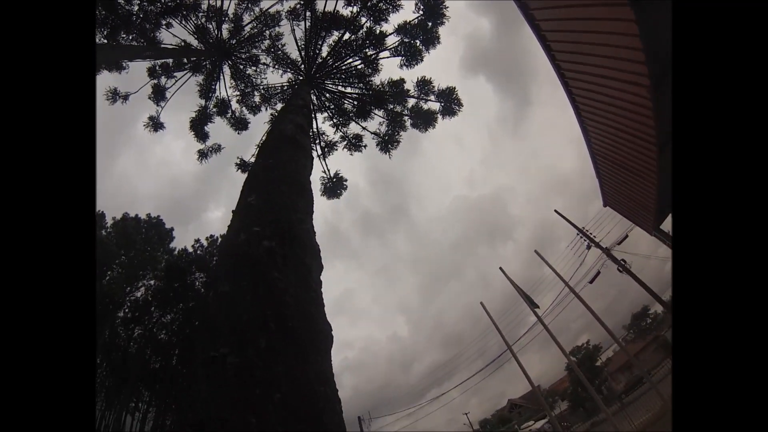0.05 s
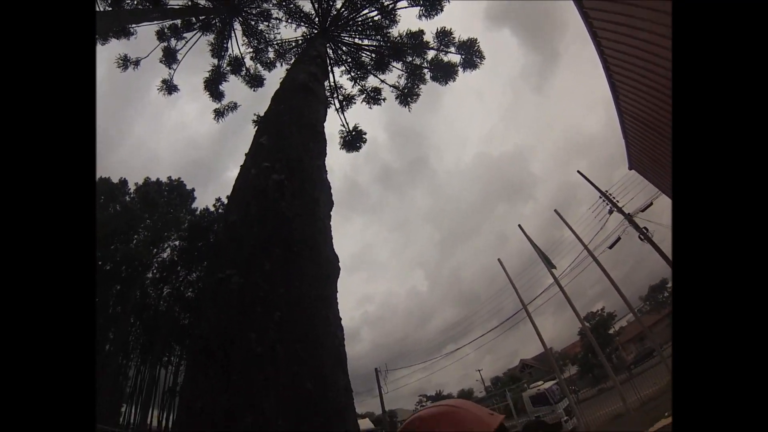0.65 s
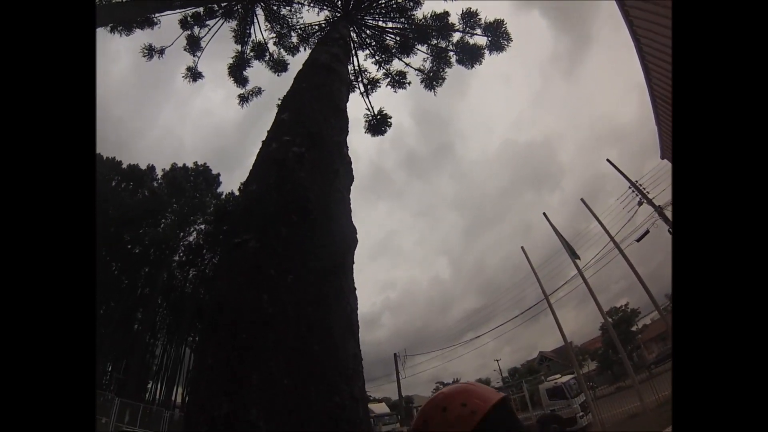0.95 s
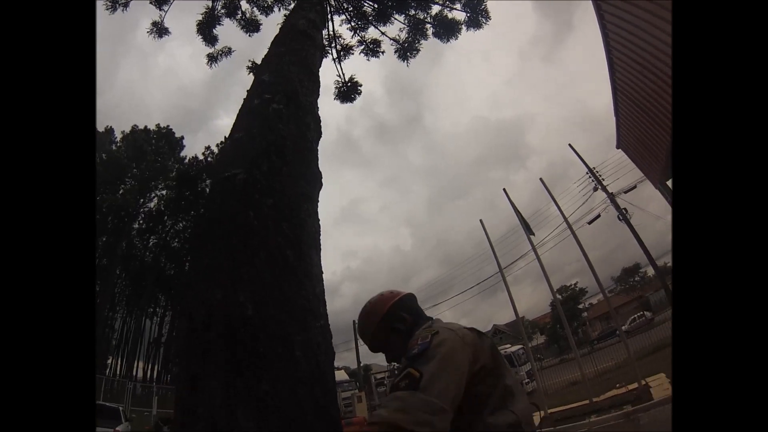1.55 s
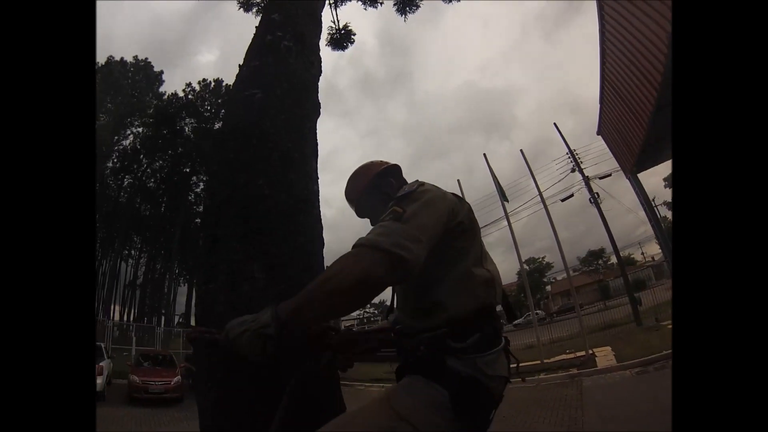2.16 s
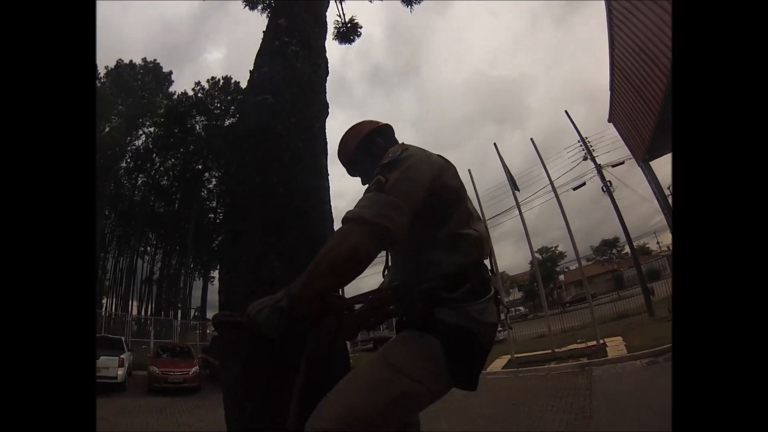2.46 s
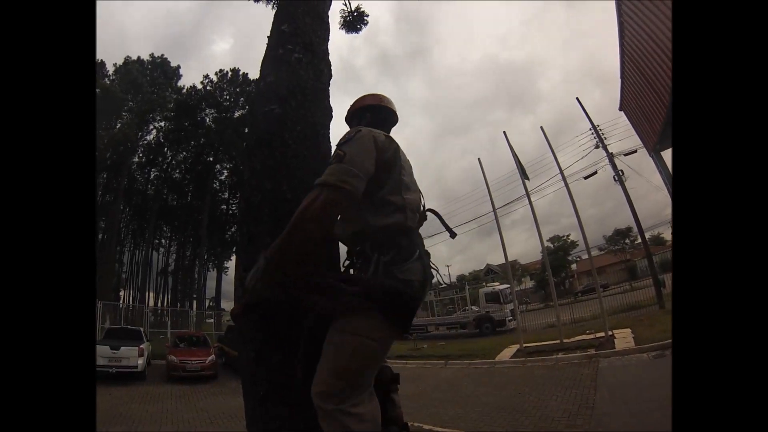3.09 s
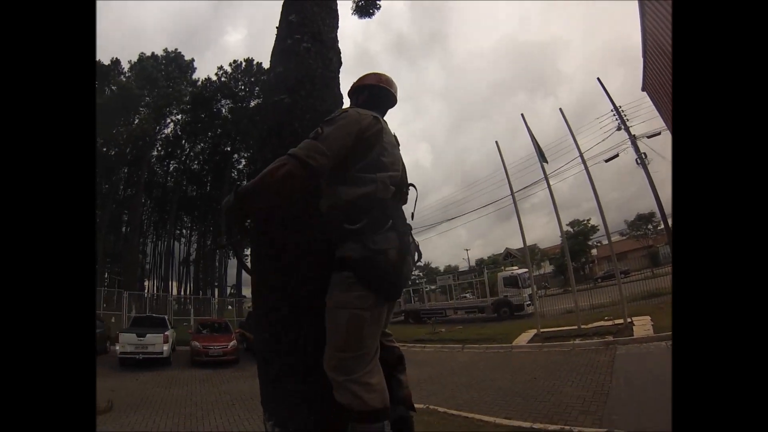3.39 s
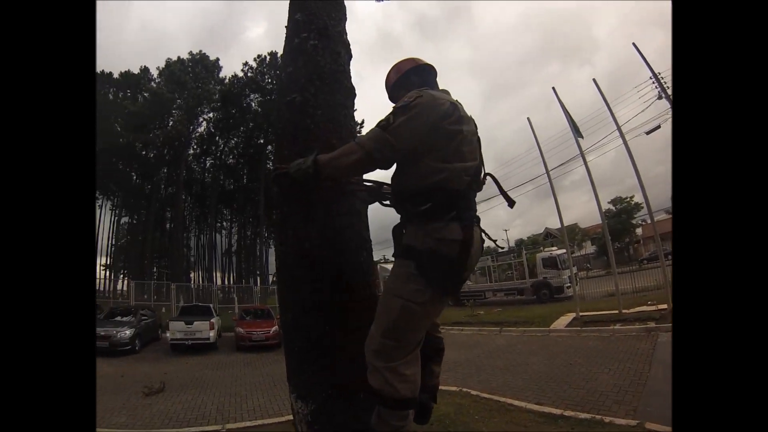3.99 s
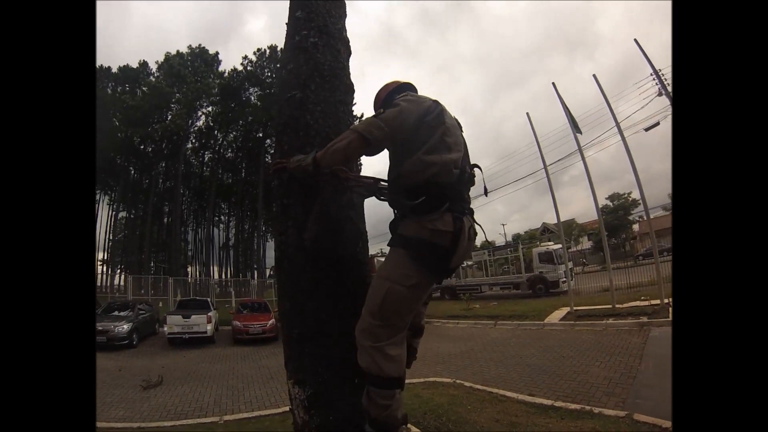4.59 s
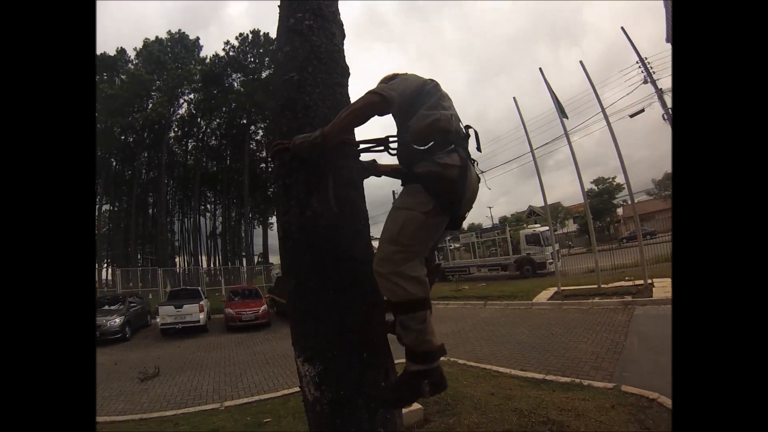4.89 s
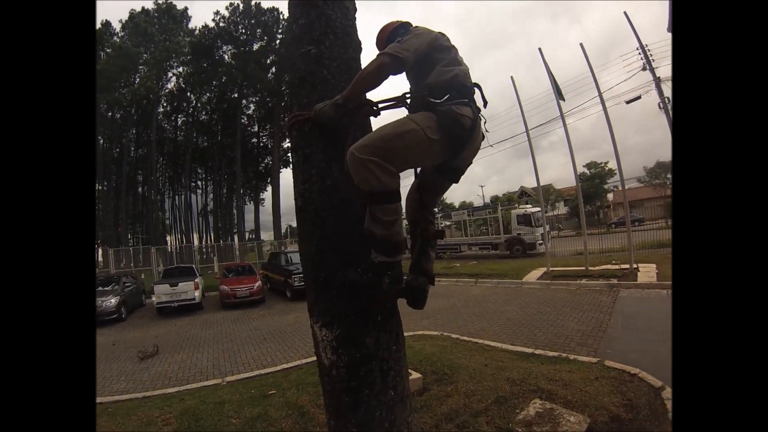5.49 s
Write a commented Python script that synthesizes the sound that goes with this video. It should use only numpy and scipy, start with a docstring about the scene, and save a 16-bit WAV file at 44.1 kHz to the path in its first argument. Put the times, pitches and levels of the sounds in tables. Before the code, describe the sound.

In a quiet yard, low puffs of wind rumble on the microphone, with soft bumps from the hand holding it. A climber's hook clinks faintly, a strap scuffs bark and spurs tap a tree trunk. Past the middle, buckles tick thinly and one sharp, hollow knock of gear stands out. More small clinks follow, then a firmer spur tap near the end, all over a faint outdoor hush.

```python
"""One sharp, hollow knock of gear stands out as a climber works up a tree in a quiet yard.
Spurs tap and crunch into the bark, buckles and a snap hook ring thinly, a strap scuffs the trunk.
Close up, puffs of air rumble on the microphone and the hand holding the camera bumps softly.
Behind it all sit a faint outdoor hush, far whistles, hiss and a tiny fizz once a second."""
import sys
import numpy as np
from scipy import signal
from scipy.fft import rfft, irfft, next_fast_len
from scipy.io import wavfile
from scipy.ndimage import uniform_filter1d, map_coordinates

SR = 44100
rng = np.random.default_rng(int(sys.argv[2]) if len(sys.argv) > 2 else 0)


def master_out(mix):
    """Clip the mix to full scale and print it as 16-bit PCM to the path in sys.argv[1]."""
    frames = np.transpose(np.atleast_2d(mix))
    ceiling = np.clip(frames, -1, 1)
    pcm = np.round(ceiling * 32767).astype(np.int16)
    wavfile.write(sys.argv[1], SR, pcm)


N = 249165

# Hollow gear knocks and rebounds. Each row: start in seconds, level in dB.
KNOCK_HITS = [(3.6264, -21.3), (3.6345, -41)]
# Its modes. Each row: pitch in Hz, level in dB, 60 dB decay time in seconds, swell in seconds.
HOLLOW_MODES = [(1117, 5.5, 0.011, 0.0016), (1314, 6.5, 0.014, 0.00091), (1320, -54, 0.37, .002),
                (1500, -16, 0.013, 0.0017), (1814, -15.5, 0.016, 0.00015), (2140, -15, 0.021, 0.0014),
                (2260, -20, 0.025, 0.0016), (2830, -33, 0.067, 0.00023), (3200, -20, 0.022, 0.0002),
                (3450, -17, 0.024, 0.00068), (3740, -19, 0.023, 0.00033), (4160, -24, 0.0086, .0001),
                (4970, -32.5, 0.033, 0.00011), (6000, -35, 0.012, .0001)]
# Spurs meet bark. Each row: start in seconds, level in dB, crunch share 0-1, crunch tilt in dB/octave.
SPUR_TAPS = [(1.9475, -42.5, .75, -4), (1.9525, -44, .65, -2), (2.706, -51.5, .9, 2.5),
             (3.918, -47.5, .9, -5), (4.0563, -52, .9, 4), (5.3018, -34.7, .14, -.5),
             (5.3075, -46.5, .35, -4)]
# A spur in the trunk. Each row: pitch in Hz, level in dB, 60 dB decay time in seconds.
SPUR_MODES = [(710, 2, .03), (960, -13, .02), (1220, -7, .024), (1410, -8, .04), (2180, -10.5, .022),
              (2440, -7.5, .034), (3250, -14, .022), (3640, -7.5, .018), (4300, -16, .016),
              (6770, -15, .018)]
# Buckles touch. Each row: start in seconds, level in dB, ring share 0-1, pitch multiple,
# click tilt in dB/octave.
BUCKLE_TICKS = [(2.89, -58, .1, 1, 0), (3.2285, -51, .6, 1, 0), (3.2315, -45.5, .78, 1, 1),
                (3.234, -47, .8, 1, 1), (3.3448, -47.8, .38, 1.08, -3.5), (3.3748, -50, .3, .85, -4)]
# A buckle's ring. Each row: pitch in Hz, level in dB, 60 dB decay time in seconds.
BUCKLE_MODES = [(4370, -10, .03), (5930, -4.5, .038), (8900, -10, .022), (9380, -1, .026), (9700, -4, .024),
                (11340, -5, .032), (12330, -9, .025)]
# The snap hook shifts. Each row: start in seconds, level in dB, dry rub share 0-1, pitch in Hz.
HOOK_CLINKS = [(.866, -52, .15, 2200), (.879, -53, .15, 2280), (.888, -52, .15, 2200),
               (2.679, -58, .3, 2350), (2.707, -51, .35, 2250), (4.057, -52.5, .3, 2100),
               (4.615, -52, .2, 2320), (4.634, -51.5, .2, 2220), (4.8984, -50.5, .25, 2270),
               (5.0995, -50, .16, 2130)]
# The hook's ring. Each row: multiple of its pitch, level in dB, 60 dB decay time in seconds.
HOOK_MODES = [(1, 0, .045), (1.07, -7, .03), (1.7, -8, .035), (2.35, -12, .02)]
# Strap drags. Each row: middle and half-width in seconds, level in dB, tone centre in Hz.
STRAP_SCUFFS = [(.832, .008, -65, 2900), (.836, .01, -62, 1080), (.861, .016, -62, 1300),
                (.874, .015, -61.5, 2150), (.876, .014, -66.5, 3700), (.935, .025, -69, 2500),
                (1.98, .04, -72, 3000), (2.14, .015, -70, 2800), (2.696, .019, -68.5, 3800),
                (3.36, .025, -71, 3400), (4.665, .02, -67, 4500), (4.888, .022, -69, 5300),
                (5.1, .006, -66.5, 2900)]
# Soft bumps of the hand. Each row: middle in seconds, peak in dB, pitch in Hz, hardness 0-1.
HAND_BUMPS = [(0.679, -35.3, 82, .14), (1.627, -39, 112, .1), (1.71, -44.5, 180, 0),
              (1.948, -38.5, 92, .16), (1.956, -48, 190, .3), (3.213, -44, 70.4, 0), (3.499, -42, 74, .05),
              (4.279, -42.5, 84.5, 0), (4.604, -35, 91, .03), (4.628, -34.5, 88, .04),
              (4.818, -39.5, 106, 0), (4.968, -38.5, 86, .2), (5.42, -35.5, 61.7, 0)]
# Puffs of air. Each row: middle and half-width in seconds, rise over the calm in dB.
AIR_PUFFS = [(0.078, 0.016, 10), (0.493, 0.12, 6), (0.957, 0.062, 9.5), (1.72, 0.12, 13), (1.99, 0.047, 9),
             (2.222, 0.027, 9.5), (3.319, 0.019, 9), (3.655, 0.12, 10), (3.977, 0.06, 8),
             (4.477, 0.16, 4.5), (4.875, 0.016, 9.5), (5.43, 0.014, 12)]
# Far whistles. Each row: middle and half-width in seconds, level in dB, pitch in Hz,
# glide in Hz per second, waver in Hz.
FAR_WHISTLES = [(0.3, 0.079, -74, 2180, 196, 120), (.36, .05, -77, 3760, -600, 80.4),
                (1.3, 0.06, -73.5, 2950, -1000, 280), (1.5, 0.06, -73, 2340, 900, 70),
                (1.66, 0.075, -73, 2460, -500, 65), (2.222, 0.1, -75, 2260, -700, 110)]
# Noise colours. Each row: frequency in Hz, relative level in dB.
BARK_SPECTRUM = [(300, -56), (800, -1.5), (1200, 7.5), (1700, -2.5), (2200, 2), (3000, -6.5), (3800, -5),
                 (6000, -9), (12000, -20)]
DAMPED_METAL_SPECTRUM = [(1000, -19), (3000, -7), (5500, 4), (8000, 1.5), (11000, -2), (15000, -27)]
BUFFET_SPECTRUM = [(5, -21.5), (12, -3), (20, 2), (30, -4.5), (38, -4), (48, -18), (60, -22.5), (80, -37.5),
                   (150, -62), (400, -100)]
GRIP_SPECTRUM = [(25, -21.5), (55, 1.5), (75, 0), (110, -5.5), (160, -12.5), (250, -19.5), (450, -28),
                 (1000, -50)]
HUSH_SPECTRUM = [(60, -4), (200, 5), (400, 2.5), (700, 0.5), (1000, -2.5), (1350, -1), (1800, -5.5),
                 (2350, -4.5), (3000, -9.5), (5000, -14.5), (10000, -26)]
HISS_SPECTRUM = [(100, 0), (1000, 3.5), (4000, 2.5), (7000, 0.5), (10000, -1.5), (13000, -3), (15000, -9)]
FIZZ_SPECTRUM = [(3000, -22), (9000, -10), (12500, -3), (14500, 0), (16000, -6)]

CALM_DB = -40  # rumble between the puffs
GRIP_DB, GRIP_RISE_DB_PER_S = -59, 0.47
HUSH_DB, HUSH_FADE_DB_PER_S = -63, 0.29
GRIP_FOLLOWS, HUSH_FOLLOWS = 0.42, 0.071  # dB gained per dB of a puff
EDGE_MULTIPLE = 3.1  # how much higher the hard edge of a bump sounds
FIZZ_DB, FIZZ_FIRST_S, FIZZ_PERIOD_S, FIZZ_GAP_S, FIZZ_HALF_S = -72, .485, 1.002, .025, .005
TOP_HZ = 15250


def knock():
    """Hollow gear: the low cavity modes swell, the top ones speak at once, one faint ring lingers."""
    out, t = np.zeros(N), np.arange(SR // 5) / SR
    body = sum(amp(db) * fade(t, t60) * swell(t, swell_s) * np.sin(2 * np.pi * hz * t)
               for hz, db, t60, swell_s in HOLLOW_MODES)
    body /= np.abs(body).max()
    for start, db in KNOCK_HITS:
        crack = amp(-38) * fade(t, .016) * noise(BARK_SPECTRUM, size=len(t))
        add(out, start, amp(db) * (body + crack))
    low_cut = signal.butter(6, 840, "high", fs=SR, output="sos")  # a small body radiates little bass
    return signal.sosfilt(low_cut, out)


def spurs():
    """Each tap sinks in over a millisecond, crunches bark and rings the spur, damped by the wood."""
    out, t = np.zeros(N), np.arange(SR // 10) / SR
    attack = swell(t, .0009)
    for start, db, crunch_share, tilt_db in SPUR_TAPS:
        crunch = amp(-2) * fade(t, .028) * noise(BARK_SPECTRUM, tilt_db, size=len(t))
        tap = (1 - crunch_share) * ring(SPUR_MODES, t) + crunch_share * crunch
        add(out, start, amp(db) * attack * tap)
    return out


def buckles():
    """Free metal rings thinly; metal held by webbing only clicks."""
    out, t = np.zeros(N), np.arange(SR // 10) / SR
    attack = 1 - np.exp(-t / .0012)
    for start, db, ring_share, multiple, tilt_db in BUCKLE_TICKS:
        modes = [(multiple * hz, level, t60) for hz, level, t60 in BUCKLE_MODES]
        click = fade(t, .022) * noise(DAMPED_METAL_SPECTRUM, tilt_db, size=len(t))
        tick = ring_share * ring(modes, t) + (1 - ring_share) * click
        add(out, start, amp(db) * attack * tick)
    return out


def snap_hook():
    """The heavier hook clinks lower in its ring; pitch and dryness change with how it lies."""
    out, t = np.zeros(N), np.arange(SR // 10) / SR
    attack = 1 - np.exp(-t / .0012)
    for start, db, rub_share, hz in HOOK_CLINKS:
        modes = [(multiple * hz, level, t60) for multiple, level, t60 in HOOK_MODES]
        rub = fade(t, .035) * noise(DAMPED_METAL_SPECTRUM, tilt_db=-4, size=len(t))
        clink = (1 - rub_share) * ring(modes, t) + rub_share * rub
        add(out, start, amp(db) * attack * clink)
    return out


def strap():
    """Short drags of the strap catch unevenly on the rough bark, some duller, some brighter."""
    out, t = np.zeros(N), np.arange(N) / SR
    for middle, half, db, centre_hz in STRAP_SCUFFS:
        colour = [(hz, level - 7 * abs(np.log2(hz / centre_hz))) for hz, level in BARK_SPECTRUM]
        catches = unit(amp(3.3 * wobble(260)))
        out += amp(db) * bell(t - middle, half) * catches * noise(colour)
    return out


def hand():
    """The grip murmurs through the camera body, more in a puff; harder bumps get a sharper edge."""
    t = np.arange(N) / SR
    grip_db = GRIP_DB + GRIP_RISE_DB_PER_S * t + GRIP_FOLLOWS * breeze_db() + 2.23 * wobble(14)
    out = amp(grip_db) * noise(GRIP_SPECTRUM)
    for middle, db, hz, hardness in HAND_BUMPS:
        thud = push(t - middle, hz)
        edge = push(t - middle, EDGE_MULTIPLE * hz)
        out += amp(db) * ((1 - hardness) * thud + hardness * edge)
    return out


def air_rumble():
    """Slow eddies press on the microphone, evened out so that the breeze rides their level."""
    eddies = noise(BUFFET_SPECTRUM)
    running_rms = np.sqrt(np.abs(uniform_filter1d(eddies ** 2, size=SR // 8)))
    return amp(CALM_DB + breeze_db()) * eddies / running_rms


def breeze_db():
    """How far the moving air rises above the calm as each puff swells and sinks."""
    t = np.arange(N) / SR
    return sum(db * bell(t - middle, half) for middle, half, db in AIR_PUFFS)


def hush_and_hiss():
    """The yard's far hush recedes, drifts and stirs with the breeze, over steady microphone hiss."""
    drift_db = .35 * wobble(7)
    hush_db = HUSH_DB - HUSH_FADE_DB_PER_S * np.arange(N) / SR + HUSH_FOLLOWS * breeze_db()
    return amp(hush_db + drift_db) * noise(HUSH_SPECTRUM) + amp(-69) * noise(HISS_SPECTRUM)


def whistles():
    """Thin wavering whistles, perhaps far birds, barely heard through the hush."""
    out, t = np.zeros(N), np.arange(N) / SR
    for middle, half, db, hz, glide, waver in FAR_WHISTLES:
        pitch = hz + glide * (t - middle) + waver * wobble(400)
        tone = unit(np.sin(2 * np.pi * np.cumsum(pitch) / SR))
        out += amp(db) * bell(t - middle, half) * tone
    return out


def fizz():
    """Two tiny flicks of high fizz once a second, probably from the camera's electronics."""
    t = np.arange(N) / SR
    starts = np.arange(FIZZ_FIRST_S, N / SR, FIZZ_PERIOD_S)
    flicks = sum(bell(t - start - lag, FIZZ_HALF_S) for start in starts for lag in (0, FIZZ_GAP_S))
    return amp(FIZZ_DB) * flicks * noise(FIZZ_SPECTRUM)


def yard_echo(sound):
    """Ground and walls scatter a short, diffuse tail."""
    t = np.arange(SR // 2) / SR
    tail = fade(t, t60=0.31) * rng.standard_normal(len(t))
    return signal.fftconvolve(sound, tail / np.linalg.norm(tail))[:N]


def ring(modes, t):
    """Damped modes, struck at slightly new strengths each time, peak 1."""
    partials = sum(amp(db + rng.normal()) * fade(t, t60) * np.sin(2 * np.pi * (hz * t + rng.random()))
                   for hz, db, t60 in modes)
    return partials / np.abs(partials).max()


def push(t, hz):
    """One push at t = 0 with a dip on either side, strongest at hz."""
    spread = (np.pi * hz * t) ** 2
    return (1 - 2 * spread) * np.exp(-spread)


def noise(spectrum, tilt_db=0, size=N):
    """Noise of rms 1 with the given spectrum, tilted by tilt_db an octave."""
    fft_size = next_fast_len(size)
    octave = np.log2(np.fft.rfftfreq(fft_size, 1 / SR) + 1)
    hz, db = np.transpose(spectrum)
    gain = amp(np.interp(octave, np.log2(hz), db) + tilt_db * octave)
    white = rfft(rng.standard_normal(fft_size))
    return unit(irfft(white * gain, fft_size)[:size])


def wobble(rate):
    """A smooth random curve, rate knots a second."""
    knots = rng.standard_normal(int(N * rate / SR) + 4)
    return map_coordinates(knots, [np.arange(N) * rate / SR])


def swell(t, rise_s):
    """A rounded attack from 0 to 1."""
    return 1 - np.exp(-(t / rise_s) ** 2)


def bell(t, half):
    """A smooth rise and fall around t = 0; the half-width is one standard deviation."""
    return np.exp(-(t / half) ** 2 / 2)


def fade(t, t60):
    """A decay that loses 60 dB in t60 seconds."""
    return np.exp(-np.log(1000) * t / t60)


def amp(db):
    """Decibels to gain."""
    return 10 ** (np.asarray(db) / 20)


def unit(x):
    """x at rms 1."""
    return x / np.sqrt(np.mean(x ** 2) + 1e-20)


def add(track, start_s, sound):
    """Mix a short sound into the track."""
    part = track[round(start_s * SR):][:len(sound)]
    part += sound[:len(part)]


def scene():
    """The mono mix: gear with a faint echo, rumble on the camera and the quiet bed behind."""
    gear = knock() + spurs() + buckles() + snap_hook() + strap()
    echo = amp(-27) * yard_echo(gear)
    rumble = hand() + air_rumble()
    bed = hush_and_hiss() + whistles() + fizz()
    return (gear + echo + rumble + bed)[None]


def record(dry):
    """The camera cuts all treble above TOP_HZ."""
    fft_size = next_fast_len(N + SR // 2)
    passband = np.fft.rfftfreq(fft_size, 1 / SR) < TOP_HZ
    return irfft(rfft(dry, fft_size) * passband, fft_size)[:, :N]


dry = scene()
out = record(dry)
master_out(out)
```